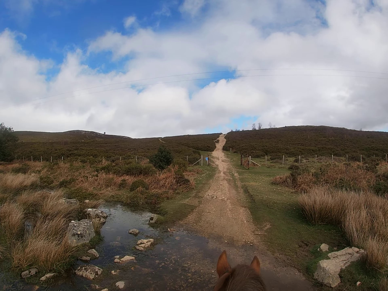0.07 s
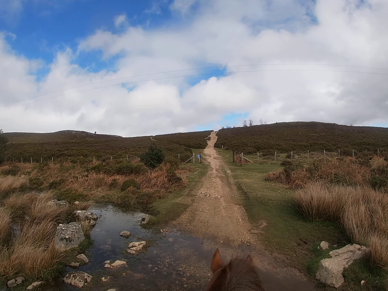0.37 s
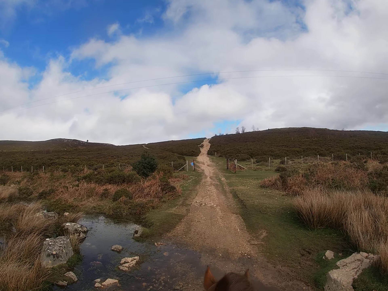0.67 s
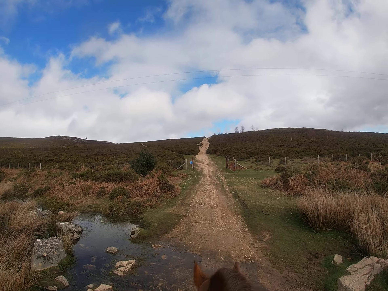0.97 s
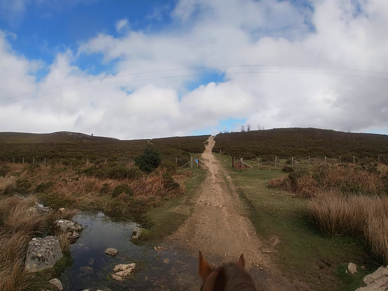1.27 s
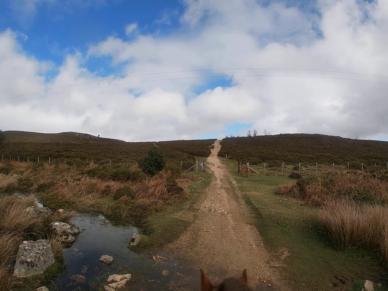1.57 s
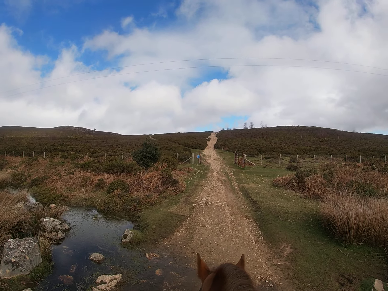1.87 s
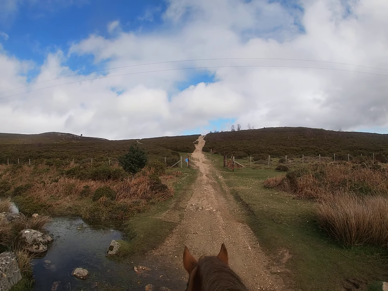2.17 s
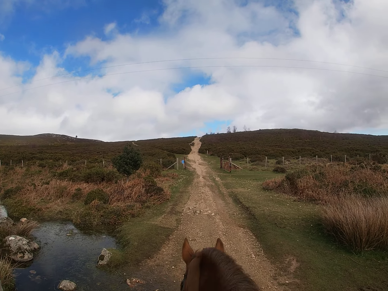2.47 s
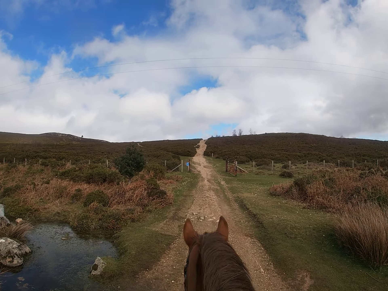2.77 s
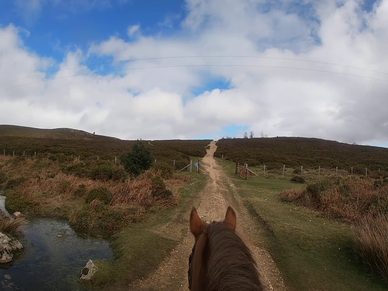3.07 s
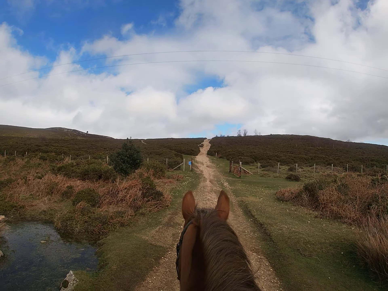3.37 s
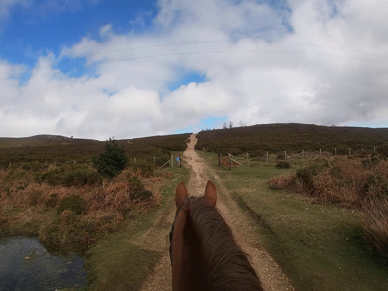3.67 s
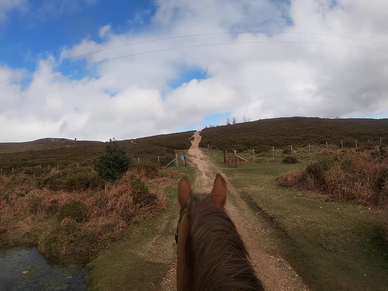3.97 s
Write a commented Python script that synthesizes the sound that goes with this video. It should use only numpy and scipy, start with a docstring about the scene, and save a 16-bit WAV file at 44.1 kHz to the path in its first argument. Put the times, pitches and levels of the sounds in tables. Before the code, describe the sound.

Horse hooves clop through shallow water onto gravel while gusty wind buffets the microphone.

```python
"""Gusts buffet the microphone first, rumbling and thumping; then hooves clack on the stones below.
Heard from the saddle, a horse walks out of a shallow stream and up a wet gravel track.
Each strike rings the hoof, the horse's weight thuds into the gravel, and water and grit fly up.
Stirred water and stones hiss underneath, thrown drops tick, and a small bird whistles far away."""
import sys
import numpy as np
from scipy import signal
from scipy.fft import rfft, irfft, next_fast_len
from scipy.io import wavfile
from scipy.ndimage import uniform_filter1d, map_coordinates

SR = 44100
rng = np.random.default_rng(int(sys.argv[2]) if len(sys.argv) > 2 else 0)


def waveform_to_disk(signal):
    """Save audio, clipped to [-1, 1], as 16-bit WAV at the path in sys.argv[1]."""
    frames = np.transpose(np.atleast_2d(signal))
    scaled = np.clip(frames, -1, 1) * 32767
    samples = np.round(scaled).astype(np.int16)
    wavfile.write(sys.argv[1], SR, samples)


N = 176400
T = np.arange(N) / SR

# Levels are relative: each layer's gain and the microphone's colour come on top.
# notes of the distant bird: t/s, length/s, start f/Hz, middle f/Hz, end f/Hz
BIRD_NOTES = [(0.681, 0.071, 3980, 4830, 4300), (0.752, 0.028, 5000, 4940, 5150),
              (0.793, 0.086, 4890, 5340, 5340), (0.922, 0.034, 4300, 4880, 5350),
              (1.568, 0.027, 4900, 5000, 5100), (1.729, 0.047, 5200, 5520, 5480),
              (2.01, 0.043, 4830, 4800, 4700)]

# wash of water and loose gravel underfoot: t/s, level/dB
WASH_LEVEL = [(0.0, -61.5), (0.18, -64.5), (0.41, -59.5), (0.57, -65.5), (0.77, -66), (1.25, -65),
              (1.39, -55.5), (1.53, -66), (1.73, -64), (1.97, -65), (2.16, -57), (2.25, -62.5), (2.7, -56),
              (2.85, -56.5), (3.11, -69), (3.26, -56), (3.74, -56), (3.87, -58), (4.0, -48)]
# spectrum of its hiss: f/Hz, level/dB
WASH_SPECTRUM = [(100, -7.5), (400, 10), (900, 3.5), (1600, 0), (2400, -0.5), (3500, -2), (5500, -8),
                 (8000, -23), (13000, -25)]
PEBBLES_PER_S, PEBBLE_HZ, PEBBLE_SPREAD_OCT, PEBBLE_SPREAD_DB = 420, 1545, 0.62, 4
# fine spray and crunching grit: t/s, level/dB
SPRAY_LEVEL = [(0.04, -100), (0.38, -81.5), (0.72, -93.5), (0.89, -83), (0.92, -102), (1.05, -82.5),
               (1.47, -81), (1.74, -99), (1.76, -80.5), (2.49, -86.5), (2.54, -69.5), (2.58, -83),
               (2.73, -84.5), (2.8, -76.5), (2.96, -92.5), (3.44, -78), (3.54, -84), (3.77, -70),
               (3.86, -80), (4.0, -72)]
# spectrum of the spray: f/Hz, level/dB
SPRAY_SPECTRUM = [(2500, -29.5), (5000, -4), (7500, 3.5), (10000, -3.5), (11500, -9), (13500, -7.5)]
# falling drops: t/s, level/dB
DROPS = [(.3125, -44), (0.337, -45), (0.4383, -49), (1.125, -40.5), (1.166, -40), (1.198, -41),
         (1.527, -50), (1.550, -42), (2.535, -37), (2.55, -42), (2.787, -39), (3.22, -54), (3.28, -43),
         (3.772, -47)]
DROP_HZ, DROP_T60_S = 7000, 0.012

# slow rumble of wind right on the microphone: t/s, level/dB
RUMBLE_LEVEL = [(0.0, -18.5), (0.02, -18.5), (0.08, -36), (0.15, -20), (0.27, -35), (0.31, -24),
                (0.47, -57.5), (0.53, -28), (0.67, -47.5), (0.79, -25), (0.85, -35.5), (0.9, -18),
                (1.0, -26.5), (1.21, -18.5), (1.46, -43), (1.6, -25), (1.77, -19.5), (1.83, -26),
                (2.12, -29), (2.16, -21.5), (2.25, -32), (2.28, -23), (2.37, -25.5), (2.55, -16),
                (2.57, -24), (2.74, -30.5), (2.86, -18.5), (2.97, -30), (3.09, -16.5), (3.12, -26.5),
                (3.33, -38.5), (3.53, -20.5), (3.61, -39.5), (3.87, -37.5), (3.91, -53), (4.0, -46.5)]
# strength of the gusts: t/s, level/dB
GUST_LEVEL = [(0.0, -43), (0.02, -29.5), (0.08, -52.5), (0.15, -21.5), (0.21, -62), (0.31, -28),
              (0.36, -46), (0.47, -53.5), (0.5, -33), (0.59, -39.5), (0.65, -41), (0.78, -40.5),
              (0.83, -34.5), (0.9, -21), (0.93, -26), (0.95, -24.5), (0.98, -30.5), (1.18, -27.5),
              (1.25, -24.5), (1.3, -44.5), (1.32, -26), (1.37, -34.5), (1.45, -52), (1.49, -56),
              (1.53, -34.5), (1.66, -22.5), (1.76, -20), (1.78, -30), (1.8, -23.5), (1.82, -28),
              (2.13, -39), (2.15, -20), (2.19, -31), (2.32, -26), (2.33, -27.5), (2.41, -29.5),
              (2.43, -39.5), (2.47, -26), (2.55, -24), (2.58, -39), (2.78, -24), (2.81, -44.5), (2.82, -23),
              (2.88, -28.5), (2.9, -24.5), (2.95, -35.5), (3.06, -28), (3.07, -20.5), (3.11, -29),
              (3.16, -29), (3.23, -38), (3.27, -31), (3.38, -53), (3.46, -24), (3.49, -27.5), (3.53, -22),
              (3.56, -42.5), (3.9, -47.5), (3.93, -36), (4.0, -42.5)]
# spectrum of the rumble: f/Hz, level/dB
RUMBLE_SPECTRUM = [(10, -24), (22, 0.5), (40, 0.5), (62, -0.5), (100, -4), (150, -13.5), (300, -47.5),
                   (800, -100)]
# spectrum of the buffeting: f/Hz, level/dB
BUFFET_SPECTRUM = [(50, -29), (110, 0.5), (170, 2.5), (250, -6), (350, -12.5), (550, -28.5), (1000, -42.5),
                   (2500, -71), (6000, -100)]
# spectrum of the flutter in strong gusts: f/Hz, level/dB
FLUTTER_SPECTRUM = [(120, -18), (300, 1), (420, 5.5), (700, -2.5), (1000, -9.5), (1400, -20.5), (2200, -37),
                    (6000, -81.5)]
RUMBLE_GAIN_DB, BUFFET_GAIN_DB, FLUTTER_GAIN_DB = -2, -1.5, -8
FLUTTER_GROWTH, GUST_REF_DB = 1.45, -23.5  # strong gusts are brighter
# gusts that whir in a narrow band: peak t/s, half length/s, level/dB, f/Hz
WHIRS = [(0.785, 0.054, -28, 186), (.905, 0.015, -18.5, 277), (1.22, 0.037, -31, 241),
         (1.652, 0.027, -28.5, 242), (1.731, 0.037, -32, 375), (1.906, 0.06, -41, 192),
         (2.746, 0.015, -34, 300)]
# single eddies bursting on the microphone: t/s, level/dB, f/Hz
EDDY_POPS = [(.019, -22, 270), (0.1285, -16, 327), (0.155, -10.5, 203), (0.314, -24, 275),
             (0.784, -12, 169), (0.88, -15, 289), (0.899, -6.5, 324), (.916, -9, 324), (.946, -9, 257),
             (1.107, -16.5, 274), (1.133, -17, 319), (1.228, -14, 294), (1.272, -14, 160),
             (1.627, -16, 205), (1.649, -11.5, 410), (1.684, -17.5, 259), (1.719, -15.5, 422),
             (1.735, -12.5, 594), (1.755, -16, 246), (1.798, -20.5, 234), (2.152, -22.5, 207),
             (2.302, -18, 344), (2.736, -12.5, 304), (2.852, -17, 251), (2.883, -16.5, 280),
             (3.077, -16.5, 201), (3.469, -20, 320), (3.529, -17.5, 457)]

# splashes and scuffs of wet grit: peak t/s, level/dB, rise/s, t60/s, centre f/Hz, width/octaves
SPLASHES = [(0.221, -38.5, 0.0087, 0.065, 1640, 0.51), (.245, -50.5, .015, 0.059, 4000, 0.57),
            (.508, -31, 0.024, 0.14, 1190, 0.9), (.543, -40.5, 0.03, 0.17, 2350, 0.5),
            (1.07, -45.5, 0.065, 0.31, 2620, 0.94), (1.359, -30, 0.0089, 0.079, 2170, 0.69),
            (1.374, -42, 0.017, 0.14, 3850, 0.23), (1.39, -27.5, .008, 0.078, 2170, 0.43),
            (1.445, -35.5, 0.024, 0.11, 1360, 0.84), (1.765, -38.5, 0.021, 0.11, 2290, 0.69),
            (2.086, -26, 0.0034, 0.04, 2610, 0.16), (2.081, -36.5, 0.061, 0.19, 1130, 0.94),
            (2.145, -31.5, 0.026, 0.12, 2170, 0.66), (2.165, -28, 0.018, 0.15, 1150, 0.62),
            (2.218, -38.5, .01, 0.1, 1630, 0.58), (2.376, -41.5, .04, 0.13, 1400, 0.69),
            (2.444, -36.5, .008, 0.16, 1490, 0.97), (2.484, -39.5, 0.011, 0.15, 1210, 0.54),
            (2.784, -33, 0.0049, 0.1, 2700, 0.63), (2.819, -39, .015, 0.62, 840, .9),
            (3.072, -42, 0.033, 0.42, 1390, 1.02), (3.156, -46, .008, 0.06, 1135, 0.89),
            (3.237, -41, .02, 0.028, 2600, 0.43), (3.44, -28, 0.027, 0.052, 1780, 0.75),
            (3.705, -36, .012, 0.27, 1630, 0.9), (3.98, -46.5, 0.12, 0.33, 1550, 2)]
# the horse's weight landing on stream bed and track: t/s, level/dB, f/Hz
THUDS = [(.5036, -14, 464), (1.389, -18.5, 408), (2.152, -15, 392), (2.304, -26, 573), (2.442, -26.5, 520),
         (2.496, -28, 460), (2.781, -21.5, 508), (2.812, -21, 400), (2.853, -21.5, 406),
         (3.154, -21.5, 512), (3.446, -24.5, 700)]
THUD_ATTACK_S, THUD_T60_S = 0.00056, 0.026
CRUNCH_DB, CRUNCH_HZ, CRUNCH_T60_S = -10, 860, 0.072
# hooves striking stones below the saddle: t/s, level/dB, f/Hz, t60/s
CLACKS = [(.493, -16, 1270, 0.0066), (.5038, -4.3, 1040, .013), (1.3565, -14, 1750, .012),
          (1.3888, -4.5, 1500, .011), (2.0854, -9.5, 2350, .008), (0.513, -26, 980, .035),
          (0.531, -26.5, 1270, .014), (.551, -25, 2000, 0.011), (.567, -28, 996, 0.037),
          (0.853, -34.5, 2370, 0.042), (1.061, -21, 1110, 0.011), (1.3566, -15, 946, 0.014),
          (1.364, -19.5, 2020, 0.015), (1.431, -17.5, 520, 0.035), (1.441, -20.5, 844, 0.025),
          (1.449, -20.5, 343, 0.06), (1.528, -37, 1514, 0.056), (2.1445, -20, 2120, 0.0097),
          (2.145, -15, 870, 0.015), (2.1635, -15, 1170, 0.0096), (2.442, -25, 945, 0.03),
          (2.781, -15, 1820, 0.0096), (2.903, -25, 1200, .015), (3.064, -23, 1170, 0.017),
          (3.155, -25, 860, 0.017), (3.186, -36, 2440, 0.015), (3.228, -34, 2760, 0.026),
          (3.4364, -14.5, 940, 0.015), (3.621, -27.5, 1080, 0.01), (3.649, -20.5, 616, 0.035),
          (3.699, -19, 1450, 0.018), (3.851, -31, 1460, 0.018)]
# modes of a struck hoof: ratio to its pitch, level/dB, share of its t60
HOOF_MODES = [(.4, -14, 1.4), (.8, -12, .9), (1, 0, 1), (1.3, -11, .8), (2.1, -17, .6), (3.2, -24, .5)]
CLACK_ATTACK_S, MODE_SCATTER_DB, GRIT_DB = 0.0004, 1, -15
CRACK_DB, CRACK_HZ, CRACK_T60_S = -22.5, 3120, 0.0043

# colour of the camera microphone: f/Hz, gain/dB
MIC_RESPONSE = [(20, 2), (5700, -5.5), (6400, -14), (7300, -19.5), (10000, -12.5), (12000, -15.5),
                (13500, -27.5)]
MIC_TOP_HZ = 13400


def amp(db):
    """Decibels to gain."""
    return 10 ** (np.asarray(db) / 20)


def unit(x):
    """Scale to rms 1."""
    return x / np.sqrt(np.mean(x ** 2) + 1e-20)


def curve(rows):
    """One value per sample from rows of t/s, value."""
    return np.interp(T, *np.transpose(rows))


def wobble(rate):
    """A smooth random curve, rate knots a second."""
    return map_coordinates(rng.standard_normal(4096), [T * rate], mode="wrap")


def filtered(x, response):
    """x through a gain given as a function of frequency."""
    size = next_fast_len(len(x) + 8192)
    return irfft(rfft(x, size) * response(np.fft.rfftfreq(size, 1 / SR)), size)[:len(x)]


def coloured(x, points):
    """x through points of f/Hz, gain/dB, joined on a log frequency axis."""
    f, db = np.transpose(points)
    return filtered(x, lambda hz: amp(np.interp(np.log(hz + 1), np.log(f + 1), db)))


def band(x, hz, octaves):
    """x through a bell around hz, scaled to rms 1."""
    return unit(filtered(x, lambda f: np.exp(-0.5 * (np.log2((f + 1) / hz) / octaves) ** 2)))


def noise_band(size, hz, octaves):
    """Noise around hz, rms 1."""
    return band(rng.standard_normal(size), hz, octaves)


def grains(size, rate, spread_db=0.5):
    """Random tiny impacts of uneven strength, about rate a second, rms 1."""
    hit = rng.random(size) < rate / SR
    sign = rng.choice([-1, 1], size)
    strength = amp(spread_db * np.minimum(rng.exponential(size=size), 4))
    return unit(hit * sign * strength)


def ping(hz, cycles, t):
    """A damped sine that dies by 60 dB in so many cycles."""
    return np.sin(2 * np.pi * hz * t) * amp(-60 * hz * t / cycles)


def attack(t, rise_s):
    """An onset that climbs from 0 towards 1."""
    return 1 - np.exp(-t / rise_s)


def add(track, start, sound):
    """Mix a sound into the track from start, in seconds."""
    i = round(start * SR)
    part = sound[max(-i, 0):max(N - i, 0)]
    track[max(i, 0):][:len(part)] += part


def bird():
    """Far off, a small bird gives thin whistles that glide, waver and flicker."""
    out = np.zeros(N)
    for start, length, *pitches in BIRD_NOTES:
        size = int(length * SR)
        progress = np.linspace(0, 1, size)
        glide = np.polyval(np.polyfit([0, 0.5, 1], pitches, 2), progress)
        hz = glide * (1 + 0.02 * wobble(450)[:size])
        flicker = amp(-60.5 - 4 * np.abs(wobble(110)[:size]))
        arch = np.sqrt(np.abs(np.sin(np.pi * progress)))
        add(out, start, flicker * arch * np.sin(2 * np.pi * np.cumsum(hz) / SR))
    return out


def pebbles():
    """Small stones and bubbles stirred by the hooves, each a tiny ping; higher ones are weaker. Rms 1."""
    out, t = np.zeros(N), np.arange(SR // 40) / SR
    for when, up, down, size in rng.random((int(PEBBLES_PER_S * N / SR), 4)):
        octaves = np.sqrt(6) * PEBBLE_SPREAD_OCT * (up - down)
        hz = min(PEBBLE_HZ * 2 ** octaves, SR / 4)
        strength = amp(PEBBLE_SPREAD_DB * min(-np.log(1 - size), 3.5))
        add(out, when * N / SR, strength / (1 + hz / PEBBLE_HZ) * ping(hz, cycles=24, t=t))
    return unit(out)


def wash():
    """Down at the horse's feet, stirred water and gravel hiss and small stones patter."""
    fizz = grains(N, rate=2800) + 0.68 * rng.standard_normal(N)
    hiss = unit(coloured(fizz, WASH_SPECTRUM)) * amp(12 + 1.7 * wobble(31))
    patter = amp(8) * pebbles()
    return amp(curve(WASH_LEVEL)) * (hiss + patter)


def spray():
    """The finest drops and grit crackle faintly in the treble."""
    crackle = grains(N, rate=320, spread_db=3.5) + 0.4 * rng.standard_normal(N)
    return amp(curve(SPRAY_LEVEL) + 17.5) * unit(coloured(crackle, SPRAY_SPECTRUM))


def drops():
    """Thrown drops land with tiny soft ticks."""
    out, t = np.zeros(N), np.arange(SR // 50) / SR
    for start, db in DROPS:
        envelope = amp(db - 60 * t / DROP_T60_S) * attack(t, rise_s=0.001)
        add(out, start, envelope * noise_band(len(t), DROP_HZ, octaves=0.57))
    return out


def eddies(spectrum, even_s):
    """Turbulent pressure of rms 1 whose strength is even over spans longer than even_s."""
    pressure = unit(coloured(rng.standard_normal(N), spectrum))
    span = max(int(even_s * SR), 2)
    power = np.abs(uniform_filter1d(uniform_filter1d(pressure ** 2, span), span))
    return unit(pressure / np.sqrt(power + 0.024))


def wind():
    """Right on the microphone: a slow rumble, buffeting gusts, and a ragged flutter in the strongest."""
    gust_db = curve(GUST_LEVEL)
    rumble = amp(curve(RUMBLE_LEVEL) + RUMBLE_GAIN_DB) * eddies(RUMBLE_SPECTRUM, even_s=0.12)
    buffet = amp(gust_db + BUFFET_GAIN_DB) * eddies(BUFFET_SPECTRUM, even_s=0.097)
    flutter = unit(eddies(FLUTTER_SPECTRUM, even_s=0.0073) * amp(4.83 * wobble(130)))
    flutter_db = GUST_REF_DB + FLUTTER_GAIN_DB + FLUTTER_GROWTH * (gust_db - GUST_REF_DB)
    return rumble + buffet + amp(flutter_db) * flutter


def whirs():
    """Air shed from the camera's edges swells into a short, low whir."""
    out = np.zeros(N)
    for peak_time, half_length, db, hz in WHIRS:
        air = signal.hilbert(noise_band(N, hz, octaves=0.32))
        steadied = unit(air.real / (np.abs(air) + 0.78))
        swell = np.exp(-0.5 * ((T - peak_time) / half_length) ** 2)
        out += amp(db) * swell * steadied
    return out


def eddy_pops():
    """The hardest eddies hit the microphone as short, heavily damped thumps."""
    out, t = np.zeros(N), np.arange(SR // 20) / SR
    for start, db, hz in EDDY_POPS:
        thump = ping(hz, cycles=2.95, t=t) * attack(t, rise_s=0.0013)
        add(out, start, amp(db - 0.5) * thump / np.abs(thump).max())
    return out


def splashes():
    """Water and wet grit fly up from the hooves in a quick swell of grains that dies away."""
    out, t = np.zeros(N), np.arange(SR // 2) / SR
    for peak_time, db, rise, t60, hz, octaves in SPLASHES:
        spatter = grains(len(t), rate=1800) + 0.21 * rng.standard_normal(len(t))
        since_peak = t - 2 * rise
        envelope = amp(db + np.minimum(20 * since_peak / rise, -60 * since_peak / t60))
        add(out, peak_time - 2 * rise, envelope * band(spatter, hz, octaves))
    return out


def hoof_thuds():
    """A loaded hoof knocks the ground dully, and coarse gravel crunches under it."""
    out, t = np.zeros(N), np.arange(SR // 8) / SR
    for start, db, hz in THUDS:
        knock = ping(hz, cycles=hz * THUD_T60_S, t=t)
        gravel = band(grains(len(t), rate=900), CRUNCH_HZ, octaves=0.8)
        crunch = gravel * amp(CRUNCH_DB - 60 * t / CRUNCH_T60_S)
        add(out, start, amp(db) * (knock + crunch) * attack(t, THUD_ATTACK_S))
    return out


def hoof_clacks():
    """Close below the saddle, each strike on stone cracks, rings the hoof and grinds a little grit."""
    out, t = np.zeros(N), np.arange(SR // 8) / SR
    for start, db, hz, t60 in CLACKS:
        ring = np.zeros(len(t))
        for ratio, mode_db, share in HOOF_MODES:
            decay = amp(mode_db + rng.normal(0, MODE_SCATTER_DB) - 60 * t / (t60 * share))
            ring += decay * np.sin(2 * np.pi * hz * ratio * t)
        grit = noise_band(len(t), hz, octaves=0.66) * amp(GRIT_DB - 60 * t / (1.6 * t60))
        crack = noise_band(len(t), CRACK_HZ, octaves=0.46) * amp(CRACK_DB - 60 * t / CRACK_T60_S)
        add(out, start, amp(db) * (ring + grit + crack) * attack(t, CLACK_ATTACK_S))
    return out


def scene():
    """From the saddle in open air, with no echo: wind at the microphone, hooves below, a bird far off."""
    air = wind() + whirs() + eddy_pops()
    steps = hoof_clacks() + hoof_thuds() + splashes()
    background = wash() + spray() + drops() + bird()
    return (air + steps + background)[None]


def record(dry):
    """A mono camera microphone with muffled treble and a band limit."""
    muffled = coloured(dry[0], MIC_RESPONSE)
    return filtered(muffled, lambda hz: hz < MIC_TOP_HZ)[None]


dry = scene()
out = record(dry)
waveform_to_disk(out)
```